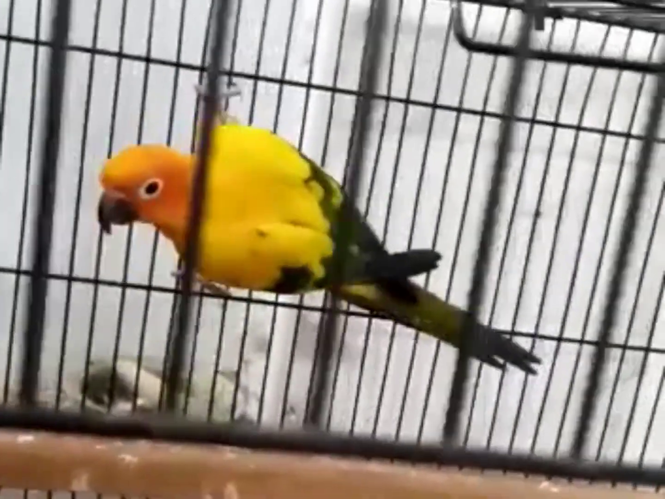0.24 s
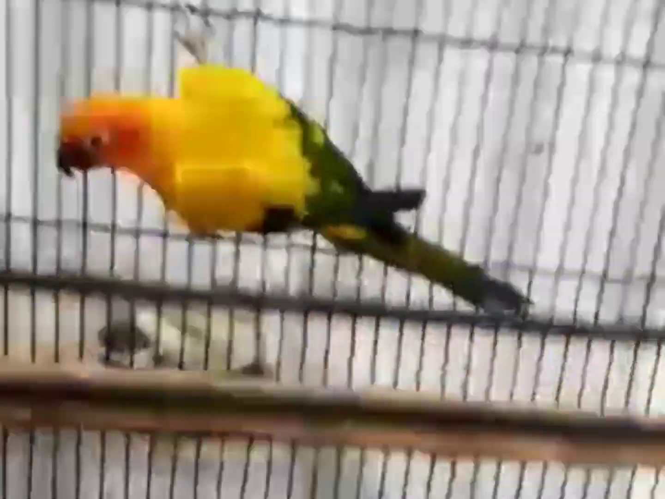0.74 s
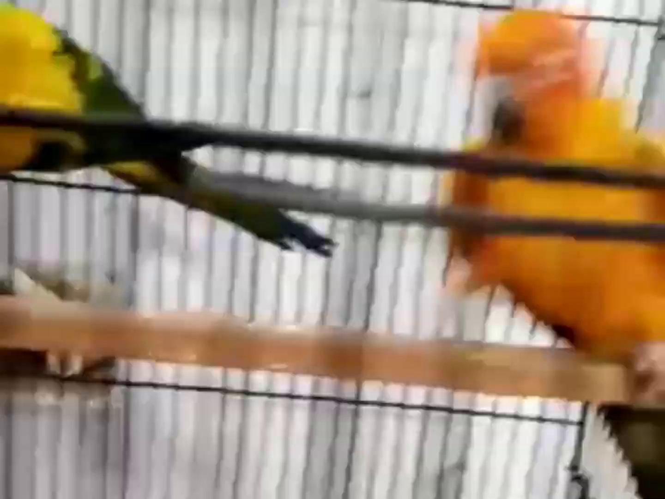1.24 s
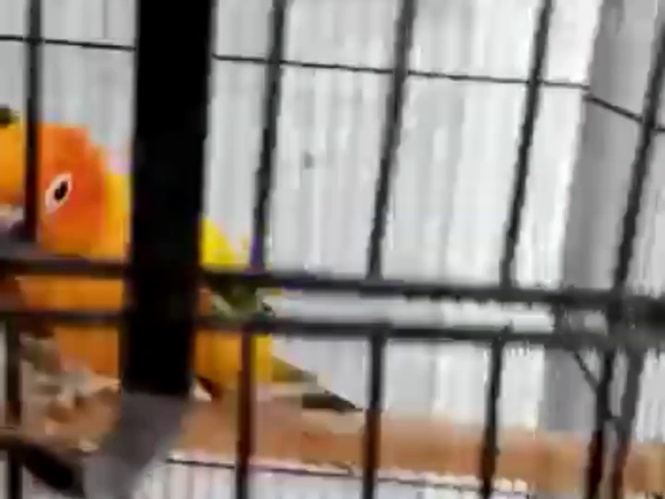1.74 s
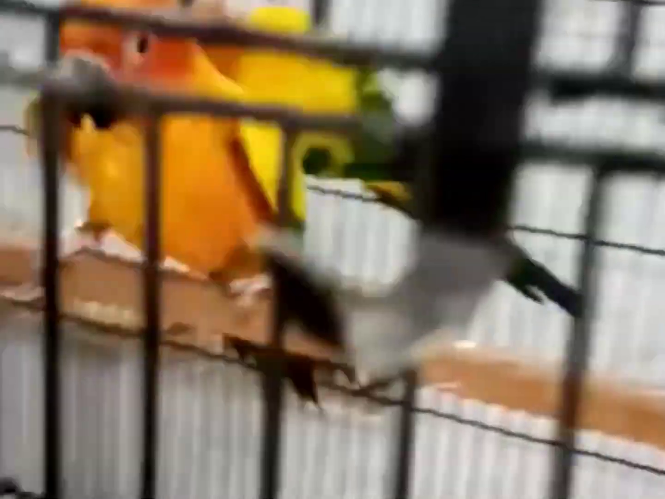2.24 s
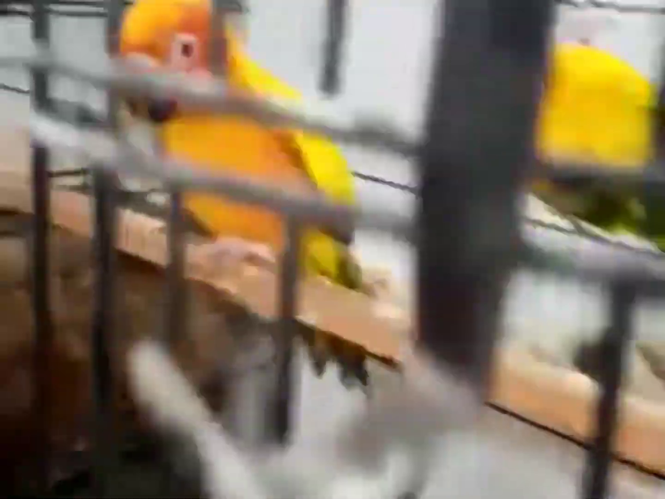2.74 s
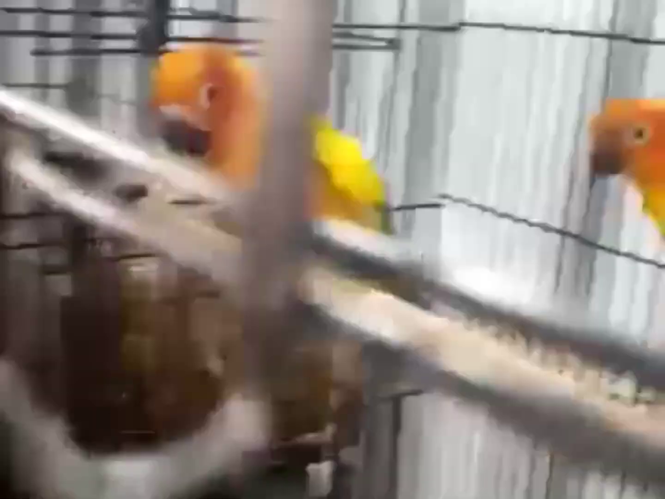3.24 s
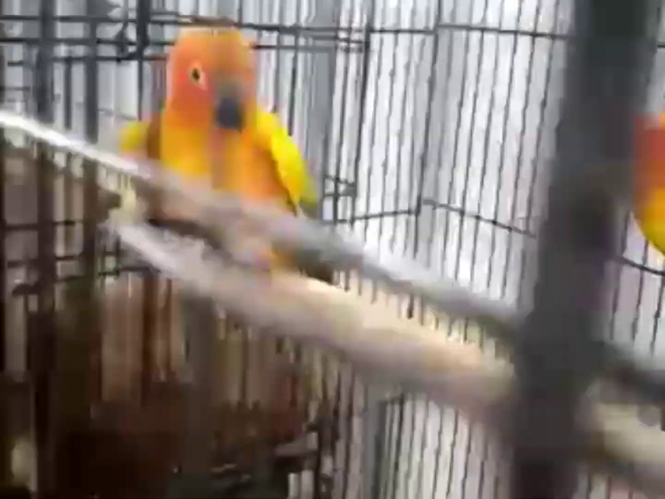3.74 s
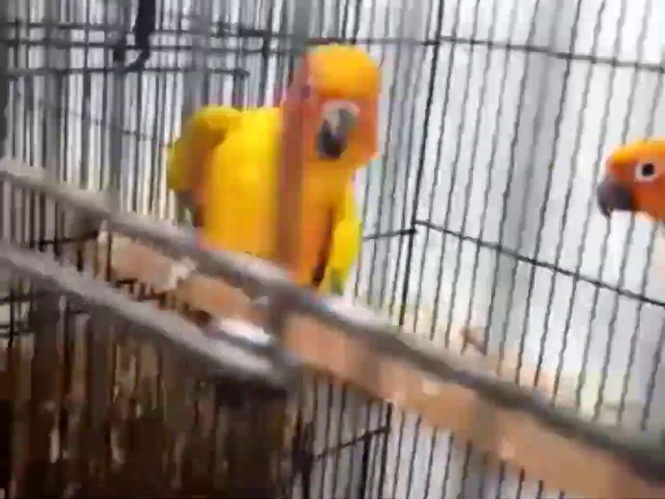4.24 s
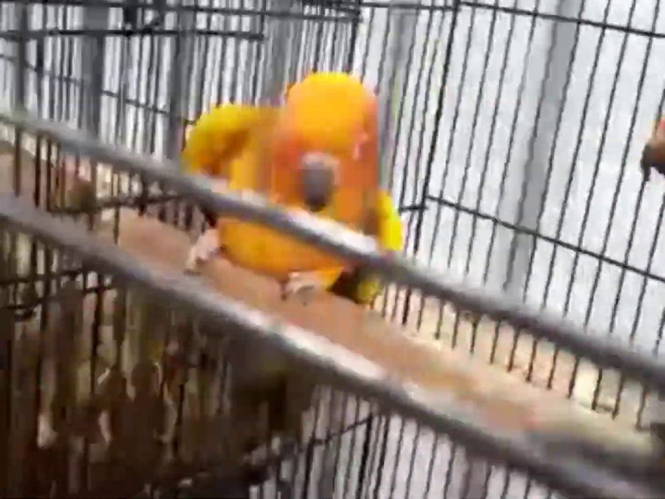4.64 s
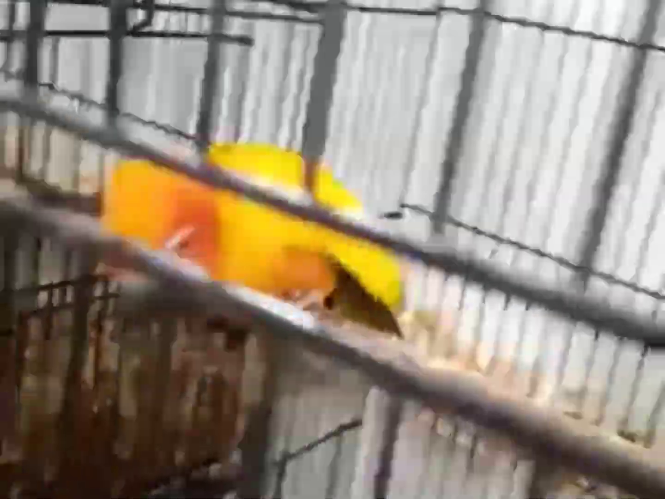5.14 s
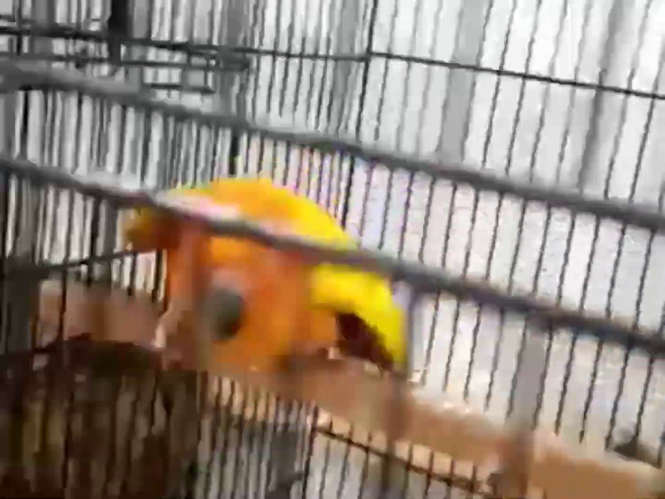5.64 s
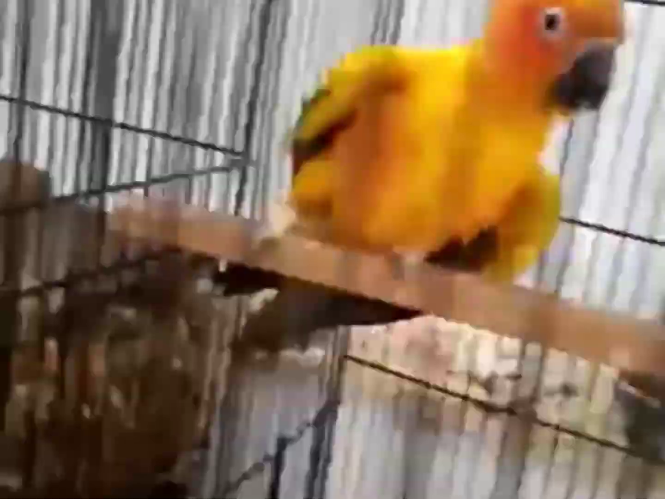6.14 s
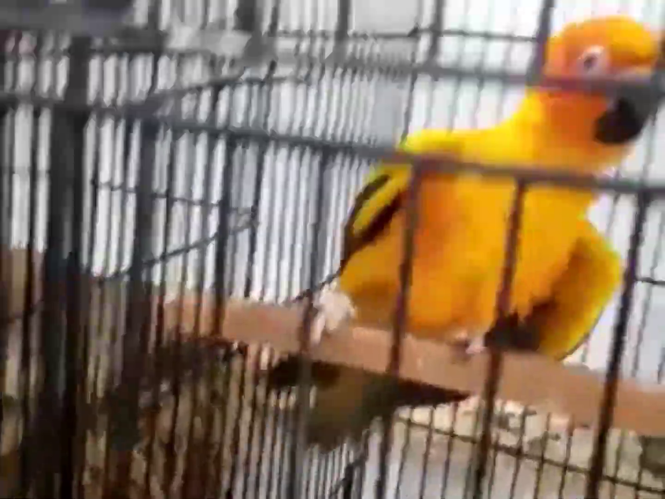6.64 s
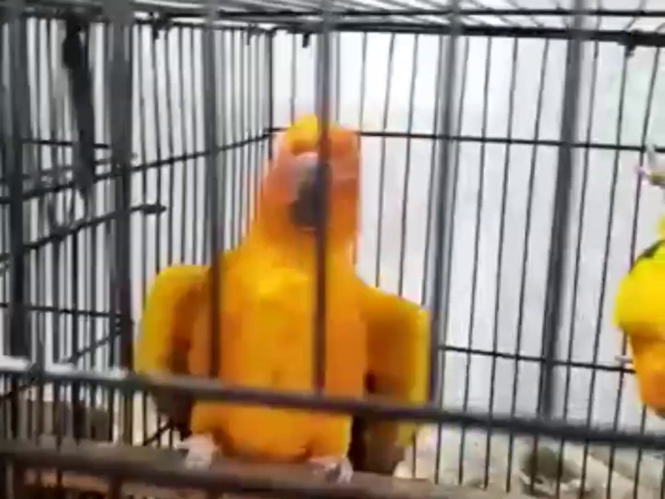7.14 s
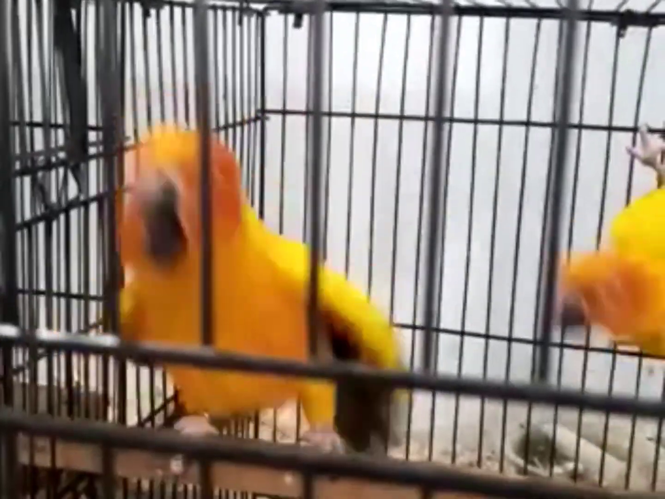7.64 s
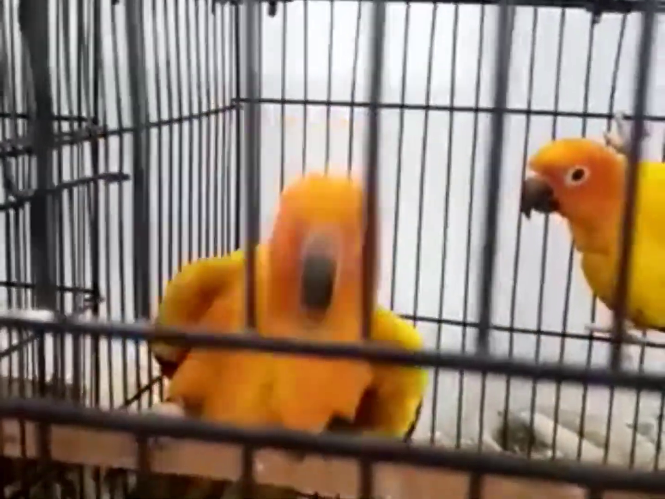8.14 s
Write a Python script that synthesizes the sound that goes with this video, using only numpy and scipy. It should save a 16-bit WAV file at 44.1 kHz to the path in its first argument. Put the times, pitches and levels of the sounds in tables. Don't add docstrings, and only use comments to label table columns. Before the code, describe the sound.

After quiet cage hum and small rustles, a parrot gives four harsh trilling screeches, pauses, then screeches twice more before another bird grumbles briefly.

```python
import sys
import numpy as np
from scipy import signal
from scipy.io import wavfile
from scipy.ndimage import uniform_filter1d

SR = 44100
rng = np.random.default_rng(int(sys.argv[2]) if len(sys.argv) > 2 else 0)


def generate_wav(sig):
    pcm = np.round(np.clip(np.atleast_2d(sig).T, -1, 1) * 32767).astype(np.int16)
    wavfile.write(sys.argv[1], SR, pcm)


def elevation(decibels):
    levels = np.asarray(decibels, float)
    return 10 ** (levels / 20)


N = 369558

# start in seconds, length in seconds, time lost in the slow first beats in seconds,
# peak effort in dB, shy first beat in dB.
SCREECH_TIMINGS = [
    (4.833, 0.18, 0.0073, 3.5, -13),
    (5.056, .188, .009, 7, 0),
    (5.364, 0.18, .012, 5.5, 0),
    (5.696, 0.17, 0.014, 9, 4),
    (7.514, .185, .0085, -0.5, -1),
    (7.846, 0.17, 0.015, 0, 4),
]
# first pitch in Hz, climb in beats, swell in dB, late half-pitch lines in dB,
# brightness in dB per octave.
SCREECH_VOICES = [(762, 2.9, 13, -21, -3), (1050, 3.5, 11.5, -39, -7.5), (930, 2.3, 15, -14, .6),
                  (1100, 2.01, 20.5, -9.5, 2.5), (930, 3.01, 15.5, -12.5, 5), (1184, 2.01, 15.5, -13, 7)]
SCREECH_TRILLS = [(0.55, 0.059, 0.84, 0.89), (0.65, 0.152, .93, 0.548), (0.445, 0.0896, 0.98, 0.634),
                  (0.384, 0.0525, 0.96, 0.532), (0.553, 0.0914, 0.7, 0.51), (0.403, 0.098, 0.71, 0.523)]
# send to the room in dB, chest tone in dB per octave below the throat peak,
# beak opening as a factor on the throat, highest overtones in dB as the head turns.
POSES = [
    (2.5, -3.5, 0.98, 6),
    (-3.5, -4.5, 1.06, 5),
    (1.5, -2.5, 0.96, 1),
    (-3, -2.5, 0.98, 1.5),
    (2.5, -3, 0.95, -6),
    (3, -3.5, 0.94, -6),
    (-1, 1.5, 0.97, -6),
]
# frequency in Hz, level in dB.
THROAT = [(1000, -11), (2000, -14.5), (3000, -0.5), (3600, 3), (4200, -2), (5000, -6), (6200, -5.5),
          (7600, -3.5), (8600, -19.5), (9800, -19.5), (11200, -36), (12700, -36), (14400, -29),
          (17000, -21)]
# time in seconds, beats gone by.
CREAK = [
    (8.084, 0),
    (8.15, 3),
    (8.26, 12),
    (8.309, 14),
    (8.327, 15),
    (8.38, 20),
]
# time in seconds, effort in dB, pitch in Hz.
GRUMBLE = [
    (8.084, -10.5, 901),
    (8.15, -18.5, 932),
    (8.24, -25, 1100),
    (8.262, -25, 743),
    (8.31, -32.5, 907),
    (8.328, -22.5, 930),
    (8.38, -29, 929),
]
# sweep as a share of pitch, open share, half-pitch lines in dB, brightness in dB per octave.
GRUMBLE_VOICE = (.1, 0.32, -33, -16)
# frequency in Hz, t60 in seconds.
ROOM_T60 = [(1000, 1), (3000, 0.53), (6000, 0.44), (9000, .38), (14000, 0.26)]
# delay in seconds, level in dB.
EARLY_ECHOES = [(.0031, -19), (.0057, -17), (.0094, -19), (.0137, -19), (.019, -18), (.026, -19)]
# start, loudest
# and end in seconds, level in dB, centre in Hz.
BROAD_RUSTLES = [
    (1.468, 1.614, 1.82, -38, 3000),
    (2.456, 2.56, 2.64, -32.5, 2740),
    (2.576, 2.63, 2.78, -35, 2300),
    (3.542, 3.695, 3.98, -39.5, 2240),
    (2.597, 2.612, 2.83, -38.5, 690),
    (7.501, 7.505, 7.514, -29, 3500),
    (3.15, 3.45, 3.3, -56, 50),
    (8.05, 8.3, 8.45, -44, 42),
    (7.2, 7.4, 7.55, -48, 45),
    (6.15, 6.6, 7.3, -52, 6800),
]
# start, loudest and end in seconds, level in dB, centre in
# Hz.
NARROW_RUSTLES = [
    (0, 0.079, 0.27, -45.5, 1530),
    (1.579, 1.598, 1.74, -39, 2050),
    (6.771, 6.87, 6.97, -40.5, 6600),
    (7.04, 7.08, 7.5, -46, 6660),
    (6.443, 6.45, 6.6, -60, 8300),
    (8.05, 8.3, 8.45, -34.5, 146),
]
# frequency in Hz, level in dB, t60 in seconds.
WIRE_MODES = [(706, -1, .1), (1420, 4, 0.5), (2050, -1.5, 0.65), (2700, 4.5, 0.48), (3120, 7, 0.11),
              (3300, 4, .15), (3870, 3, 0.38), (4250, 3, 0.19)]
# start, loudest and end in seconds, level in dB, pitch in Hz.
WHISTLES = [
    (6.243, 6.277, 6.352, -48, 5540),
    (6.361, 6.486, 6.535, -46.5, 5550),
    (6.538, 6.624, 6.76, -39, 5540),
    (6.941, 7.013, 7.16, -40.5, 5450),
    (7.151, 7.188, 7.33, -46.5, 5460),
    (7.407, 7.446, 7.53, -38.5, 5510),
    (4.24, 4.334, 4.56, -53.5, 1130),
    (4.36, 4.45, 4.66, -50.5, 1123),
    (4.55, 4.68, 4.75, -53, 1115),
]
# time in seconds, mains hum in dB, rumble in dB.
MACHINES = [(0.0, -53, -51), (.02, -45, -43), (.85, -42.5, -42), (1.64, -35.5, -41.5), (2.3, -34.5, -40.5),
            (2.8, -34.5, -41.5), (3.2, -34, -41.5), (3.55, -32, -36.5), (3.9, -37.5, -38.5),
            (4.3, -36, -39.5), (4.8, -39, -40.5), (6.12, -43.5, -36.5), (6.55, -47, -41), (7.301, -49, -38),
            (7.48, -49, -41), (8.2, -44, -36.5), (8.38, -46, -39.5)]
# frequency in Hz, level in dB per Hz.
RUMBLE = [(15, -53), (25, -28), (59, -34), (91, -13.5), (141, 7), (163, -2), (194, -10.5), (321, -3.5),
          (382, -14), (492, -15), (600, -18.5), (780, -28), (1320, -120)]
# frequency in Hz, width in Hz, level in dB.
DRONES = [(144, 25, -0.5), (292.8, 19, -2), (369, 8.7, -8.5)]
# frequency in Hz, width in Hz, level in dB.
WHINES = [(1640, 10, -65), (3350, 80, -60.5), (4560, 8.9, -61), (6830, 280, -57)]
# frequency in Hz, level in dB per Hz.
HISS = [(260, 3), (450, -3.5), (949, -3), (1120, -3), (1220, -3.5), (1780, -4), (3230, -1), (4290, -4.5),
        (4550, -3), (5370, -7), (6920, -6.5), (8270, -19), (13500, -23.5), (15000, -14.5), (16000, -13)]

BEAT_S, SETTLE_BEATS, SHY_BEATS = 0.0136, 2.4, 0.8
TOP_HZ, SAG_HZ, LAST_DROP_HZ = 2013.5, 54.76, 87
BEAT_SCATTER_SHARE, JITTER_SHARE, RASP_DB = 0.014, 0.005, -25
SWEEP_CLIMB_SHARE, SWEEP_TOP_SHARE, SWEEP_LATE_AT = 0.04, 0.1984, 0.609
OPEN_GAIN_SHARE, OPEN_FULL_SHARE = 0.111, 0.94
HALF_CLIMB_DB, HALF_CLEAR_DB, HALF_BREAK_DB, HALF_LATE_AT = -8, -30, -1, 0.72
LAST_BEAT_DB, DARKEN_DB_PER_OCT, BREAK_BRIGHT_DB_PER_OCT = -2.5, 3, 8.5


def evened(x):
    return x / np.sqrt(np.mean(x ** 2) + 1e-20)


def read(points, hz):
    f, value = np.transpose(points)
    return np.interp(np.log(hz + 1), np.log(f + 1), value)


def curves(rows):
    s, *columns = np.transpose(rows)
    t = np.arange(s[0], s[-1], 1 / SR)
    return t, [np.interp(t, s, c) for c in columns]


def add(mix, s, sound):
    part = mix[round(s * SR):][:len(sound)]
    part += sound[:len(part)]


def wobble(size, seconds):
    span = int(seconds * SR) + 1
    return evened(uniform_filter1d(uniform_filter1d(rng.standard_normal(size), span), span))


def resonate(x, hz, width_hz):
    turn = np.exp(2j * np.pi * np.cumsum(hz * np.ones(len(x))) / SR)
    r = np.exp(-np.pi * width_hz / SR)
    return 2 * (turn * signal.lfilter([1 - r], [1, -r], x / turn + 1e-18)).real


def noise(spectrum, patchy_db, flicker_db):
    frames, hz = N // 256 + 5, np.fft.rfftfreq(1024, 1 / SR)[:, None]
    a, b, patches = rng.standard_normal((frames, 513, 3)).T
    patches = evened(uniform_filter1d(uniform_filter1d(patches, 10, 0), 12, 1))
    flicker = evened(uniform_filter1d(rng.standard_normal(frames), 5)) * np.clip(hz / 9000, 0, 1)
    z = (a + 1j * b) * elevation(read(spectrum, hz) + patchy_db * patches + flicker_db * flicker)
    return evened(signal.istft(z, nperseg=1024, noverlap=768)[1][:N])


def overtones(hz, half_db, bright_db, chest_db, beak, top_db):
    turns = np.cumsum(hz) / SR
    voice = np.zeros(len(hz))
    for half in range(1, 44):
        f = half / 2 * hz
        tilt_db = np.where(f > 4000, bright_db, -chest_db)
        db = read(THROAT, f / beak) + tilt_db * np.clip(np.log2(f / 4000), -2, 1.2)
        db += top_db * np.clip((f - 12500) / 1500, 0, 1)
        db += half % 2 * (half_db - 24 * (half == 1))
        shaky = 1 + elevation(RASP_DB) * np.sqrt(half) * wobble(len(hz), 0.00031)
        tone = np.cos(np.pi * half * turns + 2 * np.pi * rng.random())
        voice += (f < 17000) * elevation(db) * shaky * tone
    return voice


def screech(trill, rows, chest_db, beak, top_db):
    t, (effort_db, hz, sweep, open_share, half_db, bright_db) = curves(rows)
    s, count = np.transpose(trill)
    beats = np.interp(t, s, count)
    hz = np.interp(np.interp(beats // 1, count, s), t, hz)
    u = beats % 1 / open_share
    rise = np.sin(np.pi / 2 * np.clip(u / 0.8, 0, 1)) ** 2.2
    rise = uniform_filter1d(rise, size=70) - 0.5
    hz = uniform_filter1d(hz, size=40) * (1 + sweep * rise + JITTER_SHARE * wobble(len(t), 0.002))
    gate = np.sin(np.pi / 2 * np.clip(np.minimum(4 * u, (1 - u) / 0.051), 0, 1)) ** 2
    gate *= np.exp(-0.77 * u)
    melt = 0.55 * np.clip(open_share - 0.8, 0, 0.2) / 0.2
    gate = uniform_filter1d(np.maximum(gate, melt), size=30)
    voice = overtones(hz, half_db, bright_db, chest_db, beak, top_db)
    loudness = np.sqrt(uniform_filter1d(voice ** 2, size=900) + 1e-9)
    return t[0], elevation(effort_db) * gate * voice / loudness * signal.windows.tukey(len(t), 0.03)


def phrase(start, length, lag, peak_db, shy_db, first_hz, climb, swell_db, late_db, bright_db,
           open_first, late_sweep, peak_at, melt_at):
    beats = np.arange(0, 20, 0.5)
    s = BEAT_S * beats + lag * (1 - np.exp(-beats / SETTLE_BEATS))
    end_beat, inside = np.interp(length, s, beats), s < length
    beats, s = np.append(beats[inside], end_beat), np.append(s[inside], length)
    gone, climbed = s / length, climb / end_beat
    last = np.clip(1.42 * (beats - end_beat) + 1, 0, 1)
    effort_db = np.interp(gone, [0, peak_at, 1], [peak_db - swell_db, peak_db, peak_db + LAST_BEAT_DB])
    effort_db += shy_db * np.exp(-beats / SHY_BEATS)
    hz = np.interp(beats, [0, climb, end_beat], [first_hz, TOP_HZ, TOP_HZ - SAG_HZ]) - LAST_DROP_HZ * last
    hz *= 1 + BEAT_SCATTER_SHARE * rng.standard_normal(len(hz))
    sweep = np.interp(beats, [climb - 1, climb, SWEEP_LATE_AT * end_beat],
                      [SWEEP_CLIMB_SHARE, SWEEP_TOP_SHARE, late_sweep])
    open_share = np.interp(gone, [0, climbed, melt_at],
                           [open_first, open_first + OPEN_GAIN_SHARE, OPEN_FULL_SHARE])
    half_db = np.interp(gone, [climbed, 0.45, HALF_LATE_AT], [HALF_CLIMB_DB, HALF_CLEAR_DB, late_db])
    half_db = half_db * (1 - last) + HALF_BREAK_DB * last
    bright_db = bright_db + DARKEN_DB_PER_OCT * (0.5 - gone) + BREAK_BRIGHT_DB_PER_OCT * last
    rows = [start + s, effort_db, hz, sweep, open_share, half_db, bright_db]
    return np.transpose([start + s, beats]), np.transpose(rows)


def grumble():
    return CREAK, [(*row, *GRUMBLE_VOICE) for row in GRUMBLE]


def room(x):
    taps = np.zeros(SR)
    at = np.arange(400, SR - 20, 20)
    taps[at + rng.integers(0, 20, len(at))] = rng.choice([-1., 1.], len(at))
    taps *= 1 - np.exp(-np.arange(SR) / SR / 0.012)
    hz, t, z = signal.stft(taps, SR, nperseg=256)
    decay_db = -60 * t / read(ROOM_T60, hz)[:, None]
    tail = signal.istft(z * elevation(decay_db), SR, nperseg=256)[1]
    tail *= elevation(-5) / np.linalg.norm(tail)
    for delay_s, db in EARLY_ECHOES:
        tail[round(delay_s * SR)] += elevation(db)
    return signal.fftconvolve(x, tail)[:N]


def rustles():
    out = np.zeros(N)
    for rows, width in [(BROAD_RUSTLES, 1), (NARROW_RUSTLES, 0.24)]:
        for start, top, end, db, hz in rows:
            t, (swell,) = curves([(start, 0), (top, 1), (end, 0)])
            grain = rng.standard_normal(len(t)) * elevation(0.87 * wobble(len(t), 0.0016))
            edges_hz = hz * np.exp(np.array([-0.5, 0.5]) * width)
            band = signal.butter(2, edges_hz, "band", fs=SR, output="sos")
            add(out, start, elevation(db) * swell * evened(signal.sosfilt(band, grain)))
    return out


def clank():
    out = np.zeros(N)
    t = np.arange(SR // 3) / SR
    scrape = rng.standard_normal(len(t)) * np.clip(t / 0.0046, 0, 1)
    for hz, db, t60 in WIRE_MODES:
        mode = evened(resonate(resonate(scrape, hz, 82), hz, 250))
        add(out, 2.638, elevation(-38 + db - 60 * t / t60) * mode)
    return out


def whistles():
    out = np.zeros(N)
    for start, top, end, top_db, hz in WHISTLES:
        t, (db,) = curves([(start, top_db - 13), (top, top_db), (end, top_db - 18)])
        sagging_hz = hz * (1 - 0.078 * (t - start))
        phase = 2 * np.pi * np.cumsum(sagging_hz) / SR + 0.6 * wobble(len(t), 0.003)
        tone = np.sin(phase) + (t > 7.4) * elevation(-21) * np.sin(2 * phase)
        level = np.sqrt(2) * elevation(db + 3.5 * wobble(len(t), 0.005))
        add(out, t[0], level * tone * signal.windows.tukey(len(t), 0.15))
    return out


def machines():
    s, *levels = np.transpose(MACHINES)
    t = np.arange(N) / SR
    hum_db, rumble_db = (np.interp(t, s, c) for c in levels)
    hum = np.sqrt(2) * np.sin(2 * np.pi * 100 * t + 0.12 * wobble(N, 0.088)) * elevation(0.45 * wobble(N, 0.13))
    white = rng.standard_normal(N)
    drones, whines = np.zeros((2, N))
    for hz, width_hz, db in DRONES:
        wavering = resonate(white, hz * (1 + 0.046 * wobble(N, 0.26)), width_hz)
        drones += elevation(db) * evened(resonate(wavering, hz, 3 * width_hz))
    for hz, width_hz, db in WHINES:
        whine_db = db + 2 + 0.3 * (hum_db + 36) + 0.89 * wobble(N, 0.1)
        whines += elevation(whine_db) * evened(resonate(white, hz, width_hz))
    rumble = evened(noise(RUMBLE, patchy_db=3.0, flicker_db=14.0) + 0.5 * drones) * elevation(0.64 * wobble(N, 0.21))
    return elevation(hum_db) * hum + elevation(rumble_db) * rumble + whines


def hiss():
    t = np.arange(N) / SR
    return noise(HISS, patchy_db=1.36, flicker_db=2.4) * elevation(-42 - 0.34 * (t - 4))


def scene():
    direct, sent = np.zeros((2, N))
    phrases = [phrase(*timing, *voice, *trill)
               for timing, voice, trill in zip(SCREECH_TIMINGS, SCREECH_VOICES, SCREECH_TRILLS)]
    phrases.append(grumble())
    for (trill, rows), (room_db, *pose) in zip(phrases, POSES):
        s, call = screech(trill, rows, *pose)
        add(direct, s, call)
        add(sent, s, elevation(room_db) * call)
    return (direct + room(sent) + rustles() + clank() + whistles() + machines() + hiss())[None]


def band_limit(x):
    return signal.sosfilt(signal.butter(12, 16110, fs=SR, output="sos"), x)


def record(dry):
    power = signal.lfilter([0.0012], [1, 0.0012 - 1], dry[0] ** 2)
    power_db = 10 * np.log10(power + 1e-12)
    fall_db = np.arange(N) * 220 / SR
    held_db = np.maximum.accumulate(power_db + fall_db) - fall_db
    over_db = uniform_filter1d(np.maximum(held_db + 23, 0), size=400)
    low = signal.sosfiltfilt(signal.butter(3, [420, 1550], "band", fs=SR, output="sos"), dry)
    mix = (dry - low) / elevation(0.6 * over_db) + low / elevation(0.82 * over_db)
    mix = signal.sosfilt(signal.butter(2, 42, "high", fs=SR, output="sos"), mix)
    mix = 0.9 * np.tanh(mix / 0.9)
    mix = signal.sosfilt(signal.ellip(10, 0.5, 80, 15650, fs=SR, output="sos"), mix)
    return band_limit(mix)


dry = scene()
out = record(dry)
generate_wav(out)
```